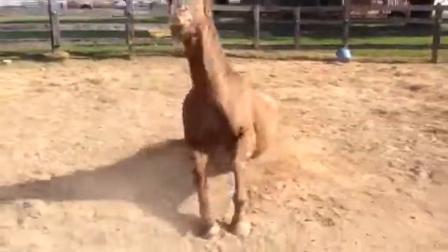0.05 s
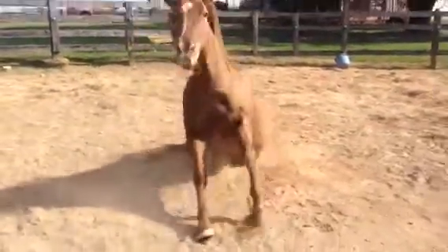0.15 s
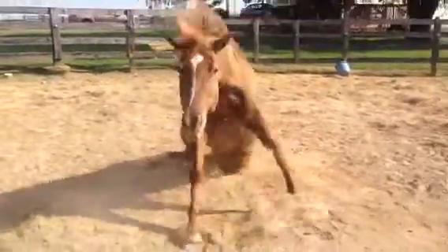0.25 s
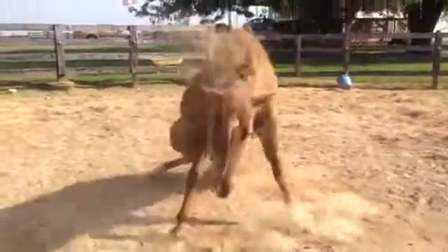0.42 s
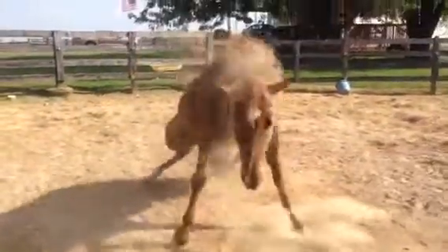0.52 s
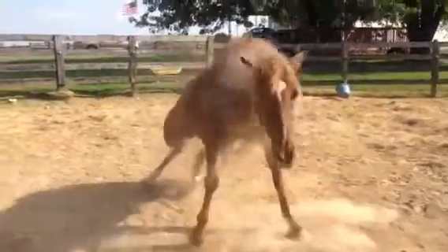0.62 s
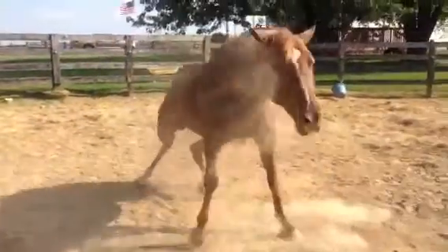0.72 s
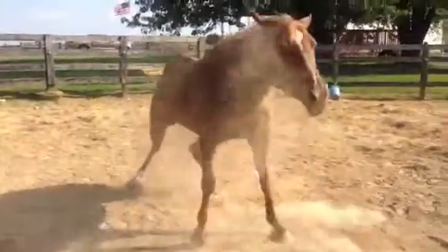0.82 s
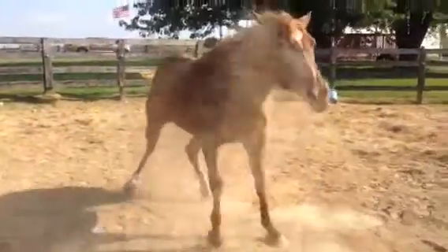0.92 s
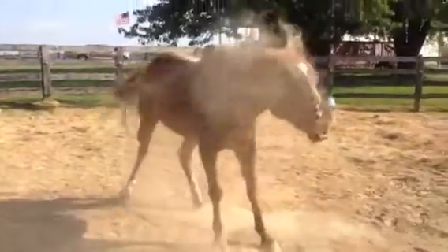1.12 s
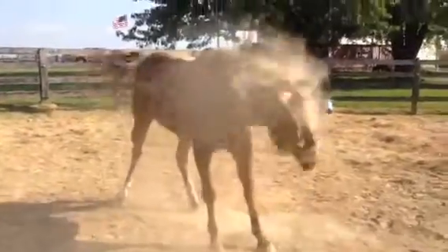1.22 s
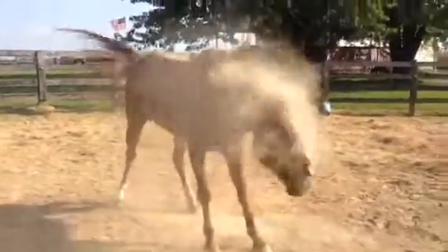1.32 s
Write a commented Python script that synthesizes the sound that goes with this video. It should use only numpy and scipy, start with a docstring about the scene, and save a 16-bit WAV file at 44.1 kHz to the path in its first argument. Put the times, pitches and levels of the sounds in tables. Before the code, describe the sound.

A horse gives one low, rattling groan that sinks to a flutter, with air hissing through its nose. Soft hoof thuds and scuffs in sand come before and after, over a faint outdoor rumble.

```python
"""A sandy paddock: a horse heaves itself up with one low, rattling groan.
The voice starts tight and sinks to a slow flutter. Every flap rings the throat and lets a puff of air
hiss through the nose, with a breathy whistle and a few tiny squeaks on top.
Hooves thud and scuff in the sand, in a short echo, over a faint outdoor rumble."""
import sys
import numpy as np
from scipy import signal
from scipy.fft import rfft, irfft, next_fast_len
from scipy.io import wavfile
from scipy.ndimage import uniform_filter1d

SR = 44100
rng = np.random.default_rng(int(sys.argv[2]) if len(sys.argv) > 2 else 0)


def waveform_to_disk(signal):
    """Save audio, clipped to [-1, 1], as 16-bit WAV at the path in sys.argv[1]."""
    frames = np.transpose(np.atleast_2d(signal))
    scaled = np.clip(frames, -1, 1) * 32767
    samples = np.round(scaled).astype(np.int16)
    wavfile.write(sys.argv[1], SR, samples)


N = 59535

GROAN_START_S, GROAN_END_S = .2421, .69
FLAP_SCATTER_DB, PUFF_SCATTER_DB = 2.24, 1.3
# Pitch drop of the groan (time [s], flap rate [Hz])
FLAP_RATE = [(.24, 128.8), (.285, 74.6), (.32, 61.1), (.36, 55.4), (.42, 52.5), (.46, 48.2), (.55, 45.5),
             (.63, 43), (.73, 42)]
# Swell of the effort (time [s], voice level [dB], air level [dB])
EFFORT = [(.24, -39, -51.5), (0.262, -37, -54), (.285, -41.5, -52), (.312, -37.5, -51.5),
          (.337, -42.5, -45.5), (0.359, -38.5, -41.5), (0.384, -35.5, -40.5), (.402, -38.5, -36),
          (0.439, -41, -36.5), (0.476, -46.5, -46), (.525, -45.5, -47.5), (0.564, -45, -50.5),
          (.61, -51, -55), (.655, -56, -51), (0.679, -62, -66.5)]
def groan():
    """Slow, uneven flaps ring the throat; just after each, a puff of air rushes through the nose."""
    t = clock()
    rate = curve(FLAP_RATE)
    sounding = (t > GROAN_START_S) & (t < GROAN_END_S)
    cycles = np.cumsum(rate * sounding) / SR
    starts = np.flatnonzero(np.diff(np.ceil(cycles)))
    scatter = rng.standard_normal((len(starts), 2))
    flaps, puffs = np.zeros(N), np.zeros(N)
    flaps[starts] = amp(FLAP_SCATTER_DB * scatter[:, 0]) * np.sqrt(SR / rate[starts])  # even power
    puffs[starts] = amp(PUFF_SCATTER_DB * scatter[:, 1])
    flow = airflow(puffs, sounding)
    times, voice_db, air_db = np.transpose(EFFORT)
    voice = throat(flaps, flow, amp(np.interp(t, times, voice_db)))
    hiss = nose(flow * amp(np.interp(t, times, air_db)))
    return voice + hiss + whistle(flow) + squeaks()


PUFF_PEAK_S, PUFF_RISE_S, PUFF_FALL_S = .0041, .0036, .0043
# Steady breath between puffs (time [s], flow [share of a puff's peak])
LEAK = [(.33, 0.52), (.42, 0.32), (.5, 0.38)]
def airflow(puffs, sounding):
    """Each flap releases a rounded puff over a steady leak; rms 1 during the groan."""
    t = clock()
    width = np.where(t < PUFF_PEAK_S, PUFF_RISE_S, PUFF_FALL_S)
    flow = through(puffs, swell(PUFF_PEAK_S, width)) + curve(LEAK) * sounding
    return flow / np.sqrt(np.mean(flow[sounding] ** 2))


RASP_ABOVE_HZ = 223
# Rasp, growing as the throat goes slack (time [s], level against the flaps [dB])
RASP = [(.44, -5), (.54, 3.5)]
# Tone of the throat: tight, open, slack (frequency [Hz], gain [dB])
THROAT_TIGHT = [(30, -20), (80, -1.5), (130, -22), (210, 0.5), (280, -7.5), (360, -3), (450, -6.5),
                (530, -43), (600, -36), (900, -41), (1400, -24.5), (1800, -79), (6000, -80)]
THROAT_OPEN = [(22, -7), (50, 1), (110, 5), (160, 6), (265, -20.5), (320, -0.5), (400, -4.5), (550, -1),
               (650, -22.5), (900, -29.5), (1200, -28.5), (1500, -20), (6000, -93)]
THROAT_SLACK = [(22, -35.5), (45, 5.5), (95, 4.5), (140, 5), (175, -4.5), (220, 3.5), (290, -12), (400, -8),
                (490, -4), (600, -10.5), (720, -22), (950, -36), (1400, -33), (1900, -48), (6000, -73)]
# Crossfades (tight until [s], open from [s], open until [s], slack from [s])
THROAT_FADES = [.255, .325, .44, .52]
def throat(flaps, flow, gain):
    """Flaps and turbulent rasp ring a throat that opens, then goes slack."""
    highpass = signal.butter(2, RASP_ABOVE_HZ, "high", fs=SR)
    rasp = signal.lfilter(*highpass, flow * rng.standard_normal(N))
    voice = (flaps + amp(curve(RASP)) * rasp) * gain
    return crossfade(voice, [THROAT_TIGHT, THROAT_OPEN, THROAT_SLACK], THROAT_FADES)


# Tone of the nose: weak flow, full flow, slack (frequency [Hz], gain [dB])
NOSE_WEAK = [(500, 6.5), (950, -21), (1450, 0.5), (1800, -29), (2350, 0.5), (2900, 1), (3400, -8.5),
             (4050, -3.5), (4500, -15), (4900, -4.5), (5400, -18), (6700, 2.5), (7300, -9.5), (8200, -14.5),
             (11000, -38)]
NOSE_FULL = [(500, 3), (950, -22.5), (1200, -2.5), (1500, -15.5), (1800, -13.5), (2000, 7), (2200, -2),
             (2850, 4), (3500, -3), (4750, -6.5), (5500, -21.5), (6700, -7.5), (7900, -26.5), (11000, -38)]
NOSE_SLACK = [(500, -30), (950, -27.5), (1200, -11.5), (1450, -6.5), (1780, -17.5), (2000, -2.5),
              (2350, -3), (3000, -1.5), (3500, -9.5), (4100, -11.5), (5300, -22.5), (6050, -10.5),
              (6500, -23), (6900, -18.5), (7700, -30.5), (11000, -43)]
# Crossfades (weak until [s], full from [s], full until [s], slack from [s])
NOSE_FADES = [.3, .36, .44, .51]
def nose(flow):
    """Turbulent air hisses through the resonances of the nose, pulsing with the flow."""
    air = flow * turbulence(patchy_db=5.5)
    return crossfade(air, [NOSE_WEAK, NOSE_FULL, NOSE_SLACK], NOSE_FADES)


# Breathy whistle (time [s], pitch [Hz], level at unit flow [dB])
WHISTLE = [(.24, 2900, -64.5), (0.292, 2920, -56), (.33, 2720, -39.5), (0.367, 2830, -50),
           (0.422, 2880, -74), (0.458, 2900, -69), (0.561, 2950, -63), (0.591, 3080, -45.5),
           (0.61, 2970, -53), (.636, 2930, -45.5), (.658, 3080, -56), (0.678, 3000, -78)]
def whistle(flow):
    """A narrow, unsteady resonance of the air in the nostrils, pulsing with the flow."""
    t = clock()
    times, hz, db = np.transpose(WHISTLE)
    return flow * narrow_noise(np.interp(t, times, hz)) * amp(np.interp(t, times, db))


# Tiny nasal squeaks (time [s], pitch [Hz], level [dB])
SQUEAKS = [(.263, 1435, -49), (0.363, 4800, -48.5), (0.384, 2076, -46), (0.417, 1237, -51.5),
           (0.543, 2290, -42.5), (.656, 1568, -54.5)]
def squeaks():
    """Now and then a puff briefly sounds one resonance of the nose."""
    return sum(amp(db) * swell(s, width_s=.004) * narrow_noise(hz) for s, hz, db in SQUEAKS)


# Hoof hits (time [s], peak level [dB], low-pass cutoff [Hz])
THUDS = [(.026, -53.5, 193), (.044, -46, 248), (.0755, -48.5, 536), (.086, -55, 197), (0.101, -47.5, 455),
         (.115, -50, 170), (0.136, -54.5, 240), (0.22, -45.5, 350), (0.724, -47, 298), (1.304, -53.5, 220),
         (1.315, -65, 222), (1.331, -41.5, 1120)]
# Body of a thud (frequency [Hz], gain [dB])
THUD_BODY = [(25, -10.5), (70, -6), (165, 2.5), (250, -3.5), (350, -5.5), (850, -9.5), (1200, -5),
             (1600, -18), (9000, -27)]
def hooves():
    """Dull pushes into soft ground; a softer footing is more muffled."""
    out, body = np.zeros(N + SR), ring(THUD_BODY)
    for s, db, hz in THUDS:
        thud = signal.lfilter(*signal.butter(2, hz, fs=SR), body)
        out[round(s * SR):][:len(thud)] += amp(db) * thud / np.abs(thud).max()
    return out[:N]


GRIT_DECAY_S = .0025
# Soft scuffs (time [s], width [s], level [dB])
SCUFFS = [(0.06, 0.044, -68.5), (0.237, 0.035, -58), (1.233, 0.0068, -62.5), (1.264, 0.018, -59.5),
          (1.328, 0.022, -62)]
# Tick of grit (time [s], level [dB])
GRIT = [(0.7, -48.5)]
# Tone of dull sand and of bright grit (frequency [Hz], gain [dB])
SAND_TONE = [(30, -11), (70, -5), (160, 3), (300, -1.5), (800, -12.5), (1400, -16), (3000, -20.5),
             (7000, -20), (12000, -43)]
GRIT_TONE = [(500, -26), (1700, -16), (2700, 9), (3800, -8), (5300, 5), (6500, 7), (8000, -11),
             (12000, -46)]
def sand():
    """Sand scuffed by the legs, with a tick of grit."""
    t = clock()
    scuffs = sum(amp(db) * swell(s, width) for s, width, db in SCUFFS)
    ticks = sum(amp(db) * (t > s) * np.exp(-np.abs(t - s) / GRIT_DECAY_S) for s, db in GRIT)
    return scuffs * noise(SAND_TONE) + ticks * noise(GRIT_TONE)


ECHO_T60_S, ECHO_DB = .2, -14
def paddock_echo(x):
    """The faint, short echo of the open paddock."""
    tail = rng.standard_normal(N) * amp(-60 * clock() / ECHO_T60_S)
    return amp(ECHO_DB) * through(x, tail / np.linalg.norm(tail))


RUMBLE_DB = -63
# Tone of the outdoor bed (frequency [Hz], gain [dB])
RUMBLE_TONE = [(20, -40), (45, 0), (70, 1), (170, 0), (280, -3), (480, -7), (850, -14.5), (2000, -15),
               (3200, -16.5), (4100, -14), (5100, -17.5), (6700, -14), (8500, -19), (15000, -22.5)]
def outdoor_rumble():
    """A steady low rumble with a trace of hiss."""
    return amp(RUMBLE_DB) * noise(RUMBLE_TONE)


def amp(db):
    """Decibels to gain."""
    return 10 ** (np.asarray(db) / 20)


def unit(x):
    """Scale to rms 1."""
    return x / np.sqrt(np.mean(x ** 2) + 1e-20)


def clock():
    """Time of every sample."""
    return np.arange(N) / SR


def curve(points):
    """Automation line through (time [s], value) points."""
    return np.interp(clock(), *np.transpose(points))


def swell(peak_s, width_s):
    """Bell-shaped envelope of height 1."""
    return np.exp(-((clock() - peak_s) / width_s) ** 2 / 2)


def ring(tone, size=8192):
    """Minimum-phase impulse response of energy 1 with the given tone."""
    f, db = np.transpose(tone)
    hz = np.fft.rfftfreq(size, 1 / SR)
    gain = amp(np.interp(np.log(hz + 1), np.log(f + 1), db))
    cepstrum = irfft(np.log(gain))
    cepstrum[1:size // 2] *= 2
    cepstrum[size // 2 + 1:] = 0
    h = irfft(np.exp(rfft(cepstrum)))
    return h / np.linalg.norm(h)


def through(x, h):
    """Play x through an impulse response."""
    return signal.fftconvolve(x, h)[:N]


def crossfade(x, tones, times):
    """Play x through the tones in turn, fading from each to the next."""
    position = np.interp(clock(), times, np.repeat(np.arange(len(tones)), 2)[1:-1])
    return sum(np.maximum(1 - np.abs(position - k), 0) * through(x, ring(tone))
               for k, tone in enumerate(tones))


def noise(tone):
    """Steady coloured noise of rms 1."""
    h = ring(tone)
    return unit(signal.fftconvolve(rng.standard_normal(N + len(h) - 1), h, "valid"))


def turbulence(patchy_db):
    """White noise of even strength whose colour shifts from moment to moment."""
    spectra = signal.stft(rng.standard_normal(N), nperseg=256)[2]
    patches = uniform_filter1d(rng.standard_normal(spectra.shape), size=2, axis=0)
    patches = uniform_filter1d(patches, size=7, axis=1)
    gain = amp(patchy_db * unit(patches))
    gain /= np.sqrt(np.abs(uniform_filter1d(gain ** 2, size=11, axis=0)))  # hold the power even
    return unit(signal.istft(spectra * gain, nperseg=256)[1][:N])


def narrow_noise(hz, half_width_hz=103):
    """Noise of rms 1 in a narrow band around hz, which may glide."""
    waver = signal.lfilter(*signal.butter(2, half_width_hz, fs=SR), rng.standard_normal((2, N)))
    phase = 2 * np.pi * np.cumsum(hz * np.ones(N)) / SR
    return unit(waver[0] * np.cos(phase) + waver[1] * np.sin(phase))


def scene():
    """The horse, its echo and the outdoor bed, in mono."""
    horse = groan() + hooves() + sand()
    return (horse + paddock_echo(horse) + outdoor_rumble())[None]


TOP_HZ = 15400
def record(dry):
    """A brick-wall high cut."""
    size = next_fast_len(N + SR // 2)
    passband = np.fft.rfftfreq(size, 1 / SR) < TOP_HZ
    return irfft(rfft(dry, size) * passband, size)[:, :N]


dry = scene()
out = record(dry)
waveform_to_disk(out)
```